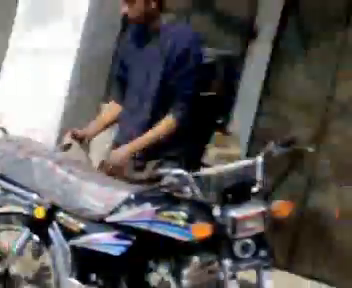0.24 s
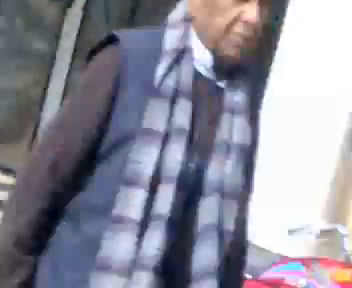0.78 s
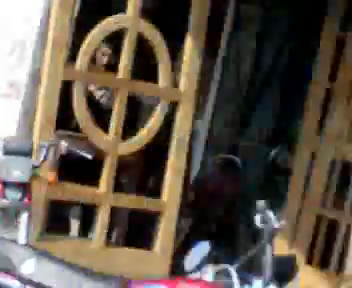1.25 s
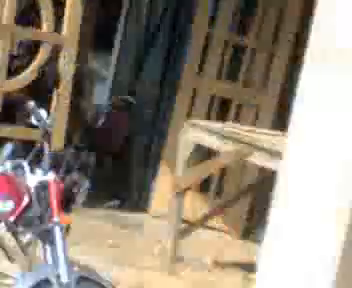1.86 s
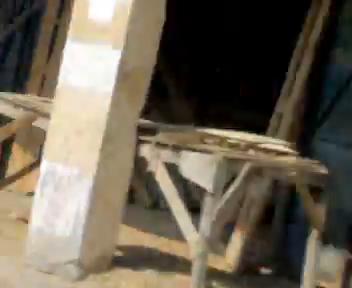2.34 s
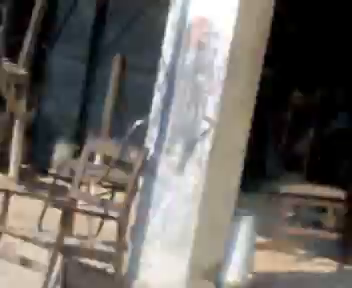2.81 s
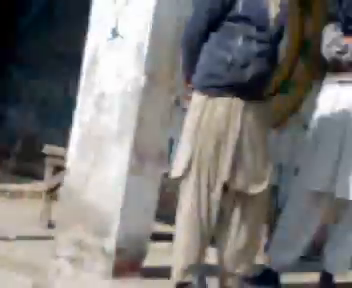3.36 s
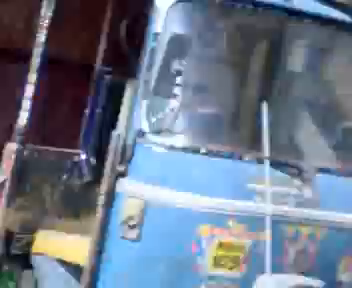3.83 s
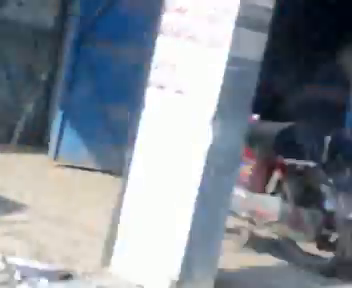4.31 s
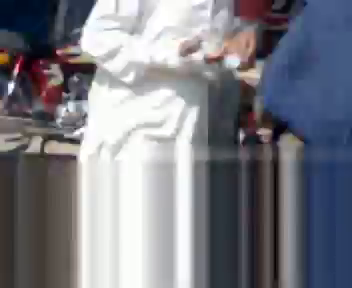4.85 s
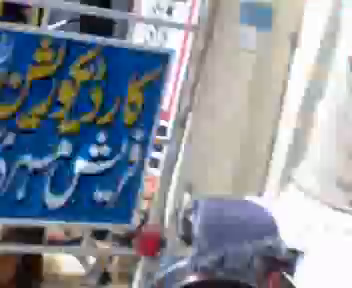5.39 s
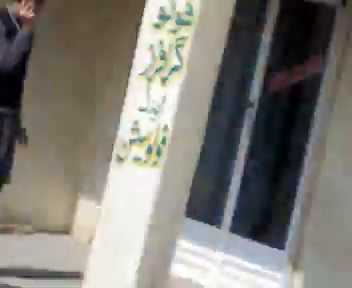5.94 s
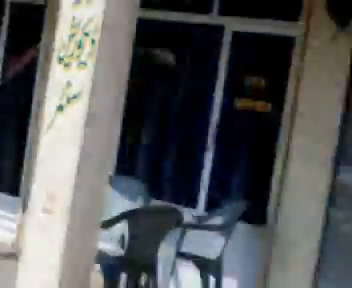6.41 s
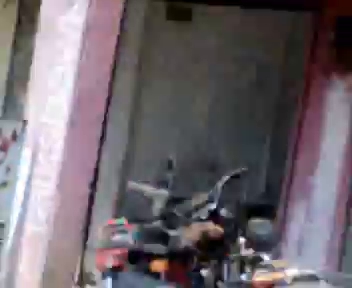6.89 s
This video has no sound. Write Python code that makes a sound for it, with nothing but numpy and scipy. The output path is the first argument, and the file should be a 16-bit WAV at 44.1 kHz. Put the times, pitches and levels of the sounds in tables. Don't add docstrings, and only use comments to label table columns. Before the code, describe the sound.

Heard from a bus passenger's seat on a village street: a low engine throb opens into a steady pull, its drone and gear whine climbing in pitch. Tyres rumble, panels hum and trim ticks. Halfway through, one loud, buzzing twin horn blast distorts the phone microphone and echoes briefly off shop fronts. The engine keeps climbing, then drops as the throttle closes.

```python
import sys
import numpy as np
from scipy import signal
from scipy.fft import rfft, irfft
from scipy.io import wavfile
from scipy.ndimage import uniform_filter1d

SR = 44100
rng = np.random.default_rng(int(sys.argv[2]) if len(sys.argv) > 2 else 0)


def wav_record(signal):
    frames = np.transpose(np.atleast_2d(signal))
    bounded = np.clip(frames, -1, 1)
    quanta = np.round(bounded * 32767).astype(np.int16)
    wavfile.write(sys.argv[1], SR, quanta)


def how_loud(loudness_db):
    steps = np.asarray(loudness_db, float) / 20
    return 10 ** steps


N = 315756

# [t/s, crankshaft turns per second f/Hz]
CRANK_SPEED = [(0.0, 12.73), (0.6, 13.98), (0.9, 14.34), (1.2, 14.82), (1.5, 15.72), (2.1, 17.75),
               (2.4, 18.91), (3.0, 20.9), (3.45, 22.2), (4.25, 23.16), (4.5, 23.52), (4.8, 24.19),
               (6.0, 27.57), (6.3, 28.35), (6.6, 28.94), (6.74, 29.04), (6.95, 26.6), (7.16, 25.5)]
# [t/s, level/dB]
THROTTLE = [
    (0, -20),
    (.55, -12),
    (.9, -3),
    (1.2, 0),
    (3.3, 0),
    (4.3, -2),
    (6.71, 0),
    (6.76, -20),
    (7.16, -24),
]
# [multiple of crank speed, level/dB]
WEAK_TONES = [(1, -38.5), (1.5, -31.5), (2, -40), (2.5, -34.5), (3, -30.5), (4, -40), (4.5, -47.5),
              (7.5, -45), (13, -55), (14, -55.5), (15, -64.5), (16, -58.5), (20, -61.5), (29.4, -55.5)]
# [f/Hz, width/Hz, lift/dB]
CABIN = [(43.1, 2.5, 5), (62.6, 5.8, 0.5), (110.7, 19, 13.5), (275, 25, 13.5), (329, 22, 17.5),
         (650, 55, 6.5)]
# [f/Hz, width/Hz, lift/dB]
EXHAUST = [(103, 18, 21), (155, 16, 17.5), (188.9, 20.7, 17), (251.8, 32.2, 13), (281.4, 24.7, 17.5),
           (341, 36, 14.5)]
AXLE = [(420, 20, 7.1), (530, 30, 6), (564.4, 18, 13), (605, 30, 8), (649.5, 46, 17), (685.5, 30, 18.3),
        (749.4, 50, 18.4), (792, 20, 19.3), (824, 30, 19), (860, 36, 15), (1000, 50, 10), (1070, 50, 13),
        (1158, 37, 12), (1410, 72, 6)]
GEARBOX = [(583, 35, 7.3), (727, 110, 9.5), (829.6, 44, 22), (886, 34, 13), (950, 40, 12), (990, 58, 14),
           (1036, 42, 17.5), (1106, 36, 15), (1151, 33, 20.6)]
# [multiple of crank speed at SLIP_FROM_S, slip per s,
# level/dB off resonance, resonances on the way]
STRONG_TONES = [(5.975, 0, -47.5, EXHAUST), (8.99, 0.0003, -46.5, EXHAUST),
                (10.04, 0.000092, -52, EXHAUST[3:]), (12, 0.00021, -54.5, EXHAUST),
                (18.02, 0, -52, [(285.5, 15, 18.3)]), (27.63, 0.000079, -53.5, AXLE),
                (35.8, 0, -61, AXLE[5:7]), (40.45, .0037, -55.5, GEARBOX), (54.2, .008, -60, AXLE)]
# [f/Hz, level/dB per Hz]
ROAD_SPECTRUM = [(8.8, -22.5), (15, -1.5), (59, 4.5), (92, 1), (162, -8.5), (199, -16.5), (309, -14.5),
                 (492, -30), (805, -21), (1250, -25), (1580, -27.5), (1890, -31), (2780, -42),
                 (6370, -64.5), (7250, -97), (9420, -100.5), (16000, -120)]
# [t/s, level/dB]
PACE = [(0, -9.5), (.45, -11.5), (.7, -6.5), (1.7, -4.5), (2.0, -2.5), (3.0, -1), (3.3, -1), (4.2, -3.5),
        (4.6, -1), (5.4, 0), (6.4, 2), (7.0, 0.5), (7.16, -4)]
# [level/dB at full pace, share of the pace, share of a jolt]
ROAD_LAYERS = [
    (-25.5, .1, 0.97),
    (-19.5, 0.45, 0.29),
    (-28, 0.85, 0.013),
    (-41.5, 0.82, 0.0053),
]
# [t/s, length/s, lift/dB]
JOLTS = [(0.258, 0.22, 10), (0.842, 0.75, 5.5), (1.332, 0.29, 7.5), (1.89, 0.33, 12), (2.23, 0.35, 11.5),
         (2.802, 0.61, 7), (3.465, 0.14, 2), (4.493, 0.22, 7), (4.967, 0.19, 6.5), (5.556, .1, 2),
         (6.003, 0.11, 5.5), (6.6, 0.66, 8), (7.01, 0.44, 7.5)]
# [f/Hz, width/Hz, early level/dB, late level/dB]
PANELS = [(41.6, 1.7, -32.5, -42.5), (112.9, 5.2, -33, -33), (451.3, 16, -50, -46.5),
          (784, 38, -51.5, -49.5), (1235, 9.8, -47.5, -46), (1450, 14, -51, -54.5), (1843, 28, -49, -52.5),
          (1905, 10, -47.5, -53), (3760, 90, -75, -77), (4020, 90, -71, -83), (5220, 290, -65, -72),
          (6260, 340, -65, -69)]
# [t/s, peak level/dB, low edge f/Hz, time to fall 60 dB/s]
TICKS = [(.057, -48, 1200, .1), (.232, -58, 2000, .06), (1.443, -48, 2200, .05), (1.757, -48, 2500, .05),
         (1.884, -53, 2500, .03), (6.259, -26, 350, .03), (6.853, -45, 5900, .07)]
# [harmonic number, low horn level/dB, high horn level/dB]
HORN_HARMONICS = [(1, -16.8, -13.4), (2, -40, -27), (3, -35.5, -36.5), (4, -31, -34), (5, -39.5, -38),
                  (6, -33.5, -34), (7, -23.5, -21), (8, -32.5, -31.5), (9, -35, -45.5), (10, -42.5, -36),
                  (11, -46, -45), (12, -54.5, -49.5), (13, -57, -46.5), (14, -52, -50.5), (15, -46, -41),
                  (16, -53, -50), (17, -52.5, -48), (18, -44, -51.5), (19, -51, -48), (20, -57, -55),
                  (21, -48, -54.5), (22, -52.5, -56.5), (23, -64, -66)]
# [harmonic, swing/dB, trim/dB]
IN_STEP = [(2, -2, -2), (3, 0, 1), (4, 5.5, -1.5), (5, 1, 1), (6, 4, 1), (7, -.5, -1), (8, -1.5, 1),
           (9, 0, 2.5), (11, 0, -3), (12, 0, -2), (13, 0, -1), (14, 0, -2), (15, 0, 2), (17, 0, -2)]
# [t/s, f/Hz, level/dB, time to fall 60 dB/s]
DISC_RINGS = [(4.09, 1925, -17, .09), (3.508, 1290, -23, .25), (4.098, 1300, -28, .2),
              (3.507, 2200, -22, .06), (3.509, 2560, -27, .1), (3.512, 960, -25, .08),
              (3.508, 5870, -37, .09), (3.511, 6260, -41, .08), (3.519, 3500, -35, .06)]
# [f/Hz, level/dB, time to fall 60 dB/s]
BRACKET_MODES = [(2000, -43, .08), (2360, -49, .06), (2690, -46, .12), (2961, -45, .55), (3030, -50, .35),
                 (3200, -53, .2), (3348, -49, .3), (3429, -45, .6), (3455, -48, .5)]

SLIP_FROM_S = 3
EXHAUST_SHARE, EXHAUST_LAG_S = .5, .15
PANEL_WAKE_S, PANEL_ASLEEP_DB, PANEL_SHIFT_S, PANEL_PACE = 1.6, -9.5, (3.4, 4.3), 0.49
PRESS_S, BUILD_S, LET_GO_S, CUT_S, COAST_S = 3.4995, .006, 4.095, .03, .075
SILENT_DB, COAST_DB, SWELL_DB = -45, -12, 0
LOW_HZ, HIGH_HZ, START_HZ, SPIN_UP_S, SAG_HZ = 324.9, 329.5, 309, .022, 20
RIPPLE_HZ, RIPPLE_RATE_HZ, RIPPLE_TOP_S = 1.2, 4.7, 3.652
LOCKED_S, PART_S = .025, .03
OPPOSED_S = 3.683
DISC_HZ, DISC_WIDTH_HZ, DISC_DB = 1915, 50, 3
BUZZ_FROM, BUZZ_LATE_DB = 11, -11
BUZZ_WAKE_S, HIGH_WAKE_S = .045, .07
FLARE_DB, FLARE_RISE_S, FLARE_FADE_S = 24, .026, .04
REVERSED = (6, 10)
TOP_HZ = 7280


def curve(rows):
    s, *columns = np.transpose(rows)
    return [np.interp(np.arange(N) / SR, s, c) for c in columns]


def unit(x):
    return x / np.sqrt(np.mean(x ** 2))


def walk(rate, count=N):
    hold = int(SR / rate)
    steps = np.repeat(rng.standard_normal(count // hold + 1), hold)
    return 2.07 * uniform_filter1d(uniform_filter1d(steps, hold), hold)[:count]


def bandpass(x, band_hz):
    return signal.sosfilt(signal.butter(2, band_hz, "bandpass", fs=SR, output="sos"), x)


def lift(hz, peaks, order=1):
    grid = np.arange(2000.)
    gain = 1 + sum((how_loud(db) - 1) / (1 + (2 * (grid - f) / w) ** (2 * order)) for f, w, db in peaks)
    return np.interp(hz, grid, 20 * np.log10(gain))


def ring(s, db, shape):
    out, i = np.zeros(N), int(s * SR)
    out[i:i + len(shape)] = how_loud(db) * shape[:N - i]
    return out


def tyres():
    t, (pace_db,) = np.arange(N) / SR, curve(PACE)
    jolt_db = sum(db * np.exp(-(2 * (t - s) / length) ** 2) for s, length, db in JOLTS)
    return [db + pace * pace_db + jolt * jolt_db for db, pace, jolt in ROAD_LAYERS]


def valve_gear(turns):
    firing = 3 * turns
    size = how_loud(3.7 * rng.standard_normal(int(firing[-1]) + 1))[firing.astype(int)]
    puff = size * np.exp(-(firing % 1) / 0.27)
    bright = bandpass(rng.standard_normal(N), [2600, 6900])
    hiss_db = tyres()[-1]
    return how_loud(-27.5 + hiss_db) * puff * bright


def engine():
    (crank_hz,), (load_db,) = curve(CRANK_SPEED), curve(THROTTLE)
    t = np.arange(N) / SR
    exhaust_db = EXHAUST_SHARE * np.interp(t - EXHAUST_LAG_S, t, load_db)
    tones = []
    for k, db in WEAK_TONES:
        hz = k * crank_hz
        tones.append((k, hz, db + load_db * EXHAUST_SHARE * (k > 10) + lift(hz, CABIN)))
    for k, slip, db, path in STRONG_TONES:
        hz = k * crank_hz * (1 - slip * (t - SLIP_FROM_S))
        drive_db = load_db if k > 20 else exhaust_db
        tones.append((k, hz, db + drive_db + lift(hz, path, order=2)))
    out = 0
    for k, hz, level_db in tones:
        gain = how_loud(level_db + (1.7 if k < 20 else 1.2) * walk(19))
        cycles = np.cumsum(hz) / SR + rng.random() + 0.04 * walk(12)
        out = out + np.sqrt(2) * gain * np.sin(2 * np.pi * cycles)
    return out + valve_gear(np.cumsum(crank_hz) / SR)


def road():
    f = np.maximum(np.fft.rfftfreq(N, 1 / SR), 1)
    hz, db = np.transpose(ROAD_SPECTRUM)
    noise = rfft(rng.standard_normal(N)) * how_loud(np.interp(np.log(f), np.log(hz), db))
    place = 2 * np.log2(f / 12.5)
    out = 0
    for level_db, bands in zip(tyres(), [range(0, 4), range(4, 8), range(8, 14), range(14, 20)]):
        layer = 0
        for b in bands:
            share = np.sqrt(np.clip(1 - abs(place - .5 - b), 0, 1))
            layer = layer + irfft(noise * share, N) * how_loud(1.31 * walk(11))
        out = out + unit(layer) * how_loud(level_db - 4.0)
    return out


def panels():
    t, out = np.arange(N) / SR, 0
    asleep_db = PANEL_ASLEEP_DB * np.clip(1 - t / PANEL_WAKE_S, 0, 1)
    drive_db = asleep_db + PANEL_PACE * curve(PACE)[0]
    for hz, width, early_db, late_db in PANELS:
        hum = unit(signal.lfilter(*signal.iirpeak(hz, hz / width, SR), rng.standard_normal(N)))
        level_db = np.interp(t, PANEL_SHIFT_S, [early_db, late_db])
        out = out + hum * how_loud(level_db + drive_db + 1.3 * walk(7))
    return out


def ticks():
    t, out = np.arange(SR // 8) / SR, 0
    for s, db, hz, t60 in TICKS:
        burst = unit(bandpass(rng.standard_normal(len(t)), [hz, min(4 * hz, TOP_HZ)]))
        out = out + ring(s, db, burst * np.minimum(t / .0025, 1) * 1000. ** (-t / t60))
    return out


def blast():
    t = np.arange(N) / SR
    on, off = np.maximum(t - PRESS_S, 0), np.maximum(t - LET_GO_S, 0)
    level_db = SILENT_DB * np.exp(-(on / BUILD_S) ** 1.3) + SWELL_DB * (on / (LET_GO_S - PRESS_S) - .5)
    level_db += np.interp(off, [0, CUT_S, CUT_S + COAST_S / 2, CUT_S + COAST_S],
                          [0, COAST_DB, COAST_DB - 5.5, SILENT_DB])
    ripple = RIPPLE_HZ * np.cos(2 * np.pi * RIPPLE_RATE_HZ * (t - RIPPLE_TOP_S))
    sway = ripple - SAG_HZ * np.minimum(off / CUT_S, 1)
    low = LOW_HZ + (START_HZ - LOW_HZ) * np.exp(-(on / SPIN_UP_S) ** 2.5) + sway
    high = low + (HIGH_HZ - LOW_HZ) * np.clip((on - LOCKED_S) / PART_S, 0, 1)
    return np.where((on > 0) & (off < CUT_S + COAST_S), level_db, -120), low, high


def bracket(level_db):
    shake = rng.standard_normal(N) * how_loud(0.17 * level_db) * (level_db > SILENT_DB)
    out = 0
    for hz, db, t60 in BRACKET_MODES:
        r = 1000. ** (-1 / (t60 * SR))
        turn = 2 * np.pi * hz / SR
        ringing = signal.lfilter([1], [1, -2 * r * np.cos(turn), r * r], shake)
        out = out + how_loud(db) * 2 * np.sqrt(1 - r) * np.sin(turn) * ringing
    return out


def discs():
    t, out = np.arange(SR // 2) / SR, 0
    for s, hz, db, t60 in DISC_RINGS:
        fade = (1 - np.exp(-t / 0.0019)) * 1000. ** (-t / t60)
        out = out + ring(s, db, fade * np.sin(2 * np.pi * hz * t))
    return out


def wake_share(k, is_high):
    if k >= BUZZ_FROM:
        return 1
    if is_high and k > 4:
        return .6
    return -.3 if k > 6 else .15


def horns():
    level_db, low_hz, high_hz = blast()
    a, b = int(PRESS_S * SR), int((LET_GO_S + CUT_S + COAST_S) * SR)
    opposed = int(OPPOSED_S * SR)
    low, high = np.cumsum(low_hz) / SR, np.cumsum(high_hz) / SR
    high += .5 - (high - low)[opposed]
    out = bracket(level_db) + discs()
    on, count = np.arange(b - a) / SR, b - a
    flare_db = FLARE_DB * (1 - np.exp(-(on / FLARE_RISE_S) ** 4)) * np.exp(-on / FLARE_FADE_S)
    together = np.cos(2 * np.pi * (high - low)[a:b])
    shared_db = {k: swing_db * together + trim_db for k, swing_db, trim_db in IN_STEP}
    for is_high, (hz, cycles) in enumerate(((low_hz[a:b], low[a:b]), (high_hz[a:b], high[a:b]))):
        jitter = .002 * walk(120, count) + .005 * walk(14, count)
        late_db = BUZZ_LATE_DB * np.exp(-(on / (BUZZ_WAKE_S, HIGH_WAKE_S)[is_high]) ** 2)
        for k, *horn_db in HORN_HARMONICS:
            fall = 1 + .6 * (k > 1) * (cycles > low[opposed])
            db = horn_db[is_high] + level_db[a:b] * fall + min(0.5 * k, 1.1) * walk(24.46, count)
            db = db + shared_db.get(k, 0) + late_db * wake_share(k, is_high)
            if k == 6 and not is_high:
                db = db + flare_db
            off_disc = 2 * (k * hz - DISC_HZ) / DISC_WIDTH_HZ
            gain = how_loud(db) * (1 + how_loud(DISC_DB) / (1 + off_disc ** 2) ** 2)
            lag = np.arctan2(0.24 * k, (DISC_HZ / HIGH_HZ) ** 2 - k ** 2)
            lag += np.pi * ((k > 1) + is_high * (k in REVERSED))
            lag += 2 * np.pi * rng.random() * (k > 10)
            out[a:b] += np.sqrt(2) * gain * np.cos(2 * np.pi * k * (cycles + jitter) - lag)
    return out


def street(x):
    t, out = np.arange(SR) / SR, 0
    for band_hz, t60, db in (([1200, 3600], .3, -25), ([3700, 7200], .23, -19)):
        tail = rng.standard_normal(SR) * 1000. ** (-t / t60) * (t > .012)
        tail = bandpass(tail, band_hz)
        tail = tail / np.sqrt(np.sum(tail ** 2))
        out = out + how_loud(db) * signal.fftconvolve(x * walk(band_hz[1] / 16), tail)[:N]
    return out


def scene():
    horn = horns()
    return (engine() + road() + panels() + ticks() + how_loud(2.5) * horn + street(horn))[None]


def low_pass(x):
    return signal.sosfilt(signal.butter(12, 9250, fs=SR, output="sos"), x)


def record(dry):
    soft = dry / (1 + abs(dry / .69) ** 5.0) ** (1 / 5.0) - .0032
    top = signal.ellip(8, .2, 60, TOP_HZ, fs=SR, output="sos")
    settled = signal.sosfilt_zi(top) * soft[0, 0]
    x = signal.sosfilt(top, soft[0], zi=settled)[0][None]
    mirror = 2 * x * np.cos(2 * np.pi * 16000 * np.arange(N) / SR)
    mix = x + how_loud(-26.5) * bandpass(mirror, [8700, 8920])
    return low_pass(mix)


dry = scene()
out = record(dry)
wav_record(out)
```